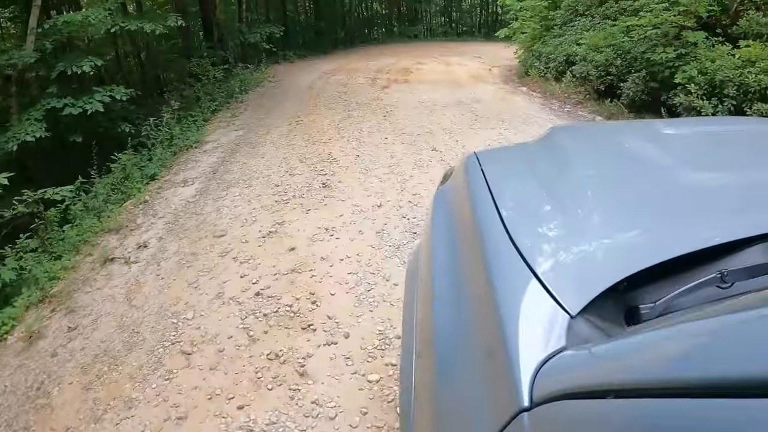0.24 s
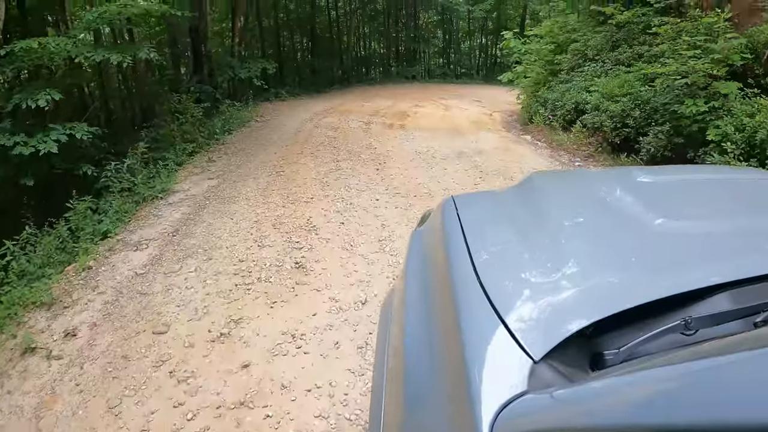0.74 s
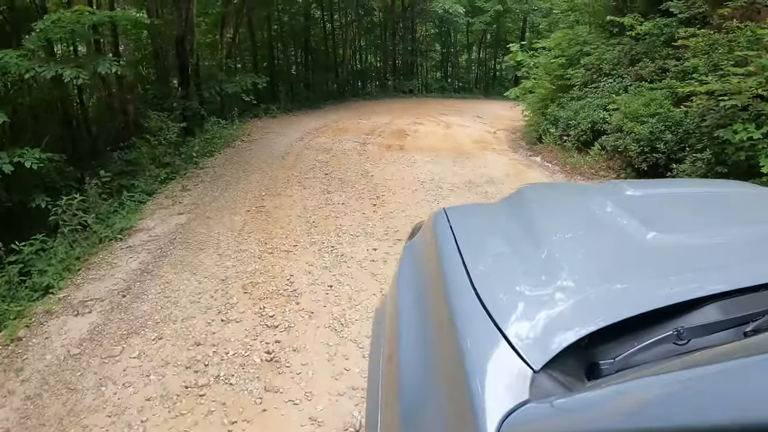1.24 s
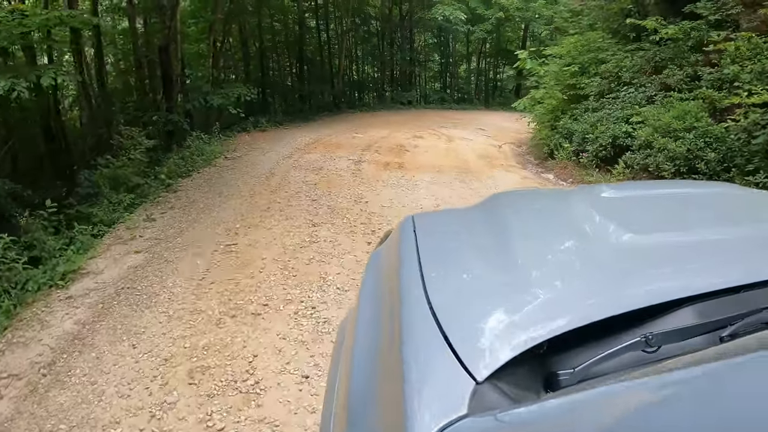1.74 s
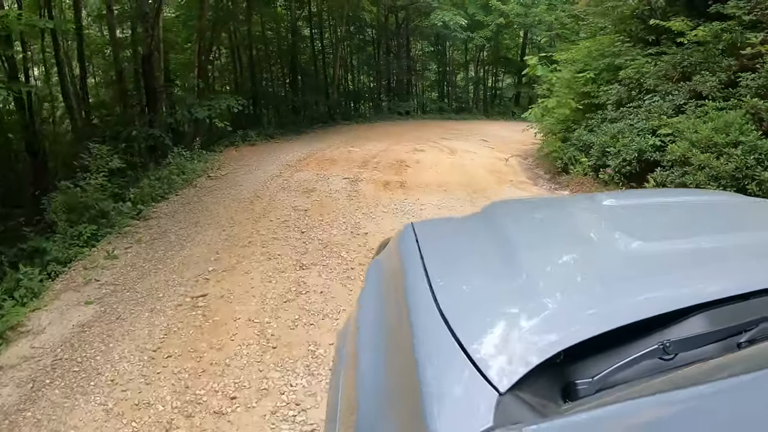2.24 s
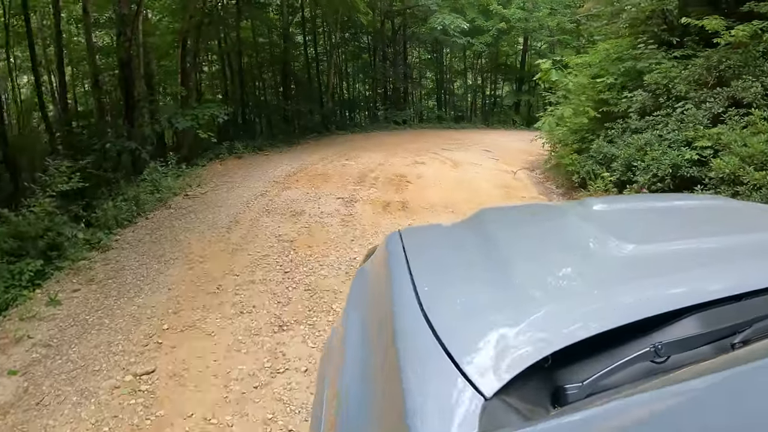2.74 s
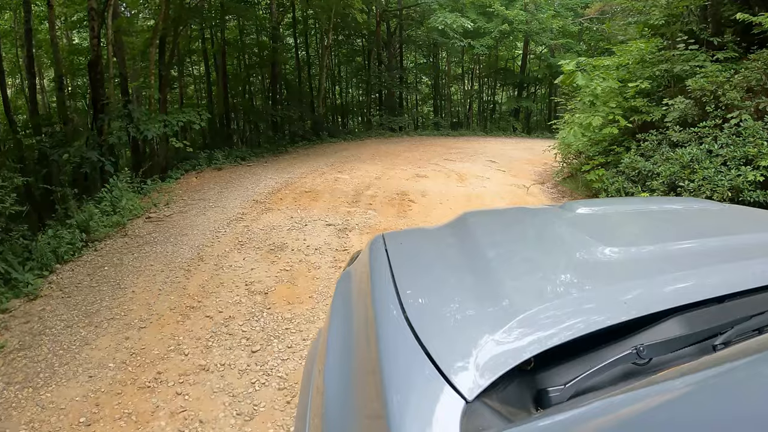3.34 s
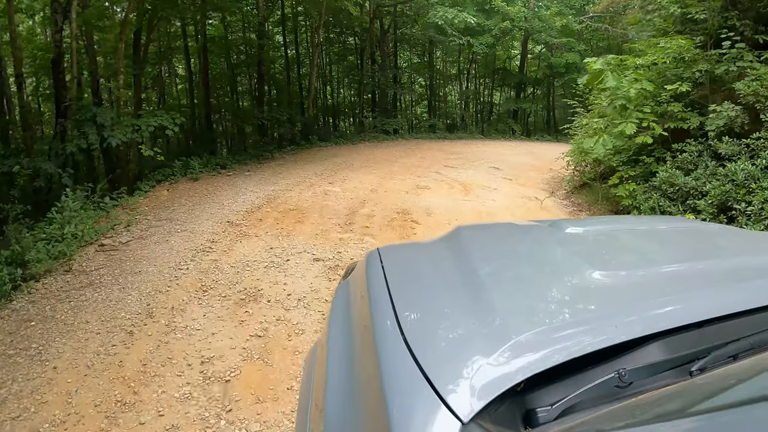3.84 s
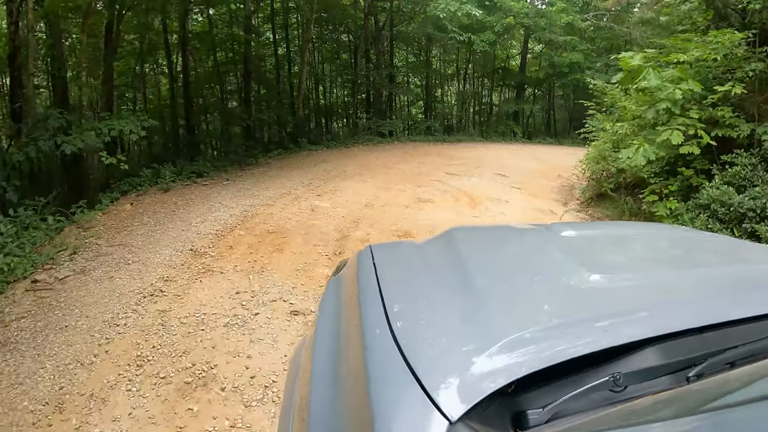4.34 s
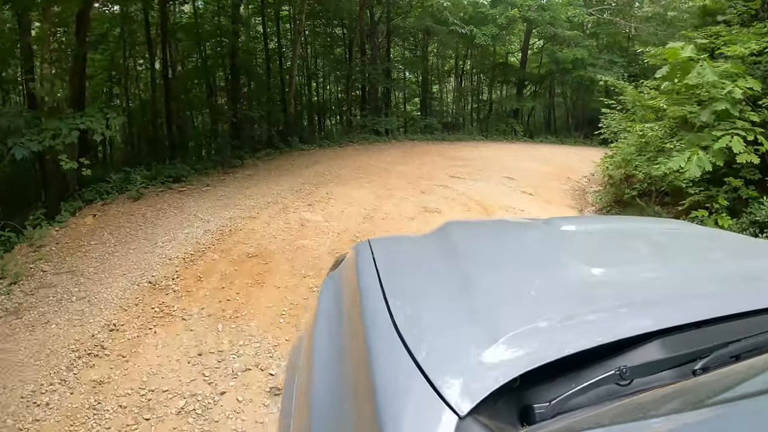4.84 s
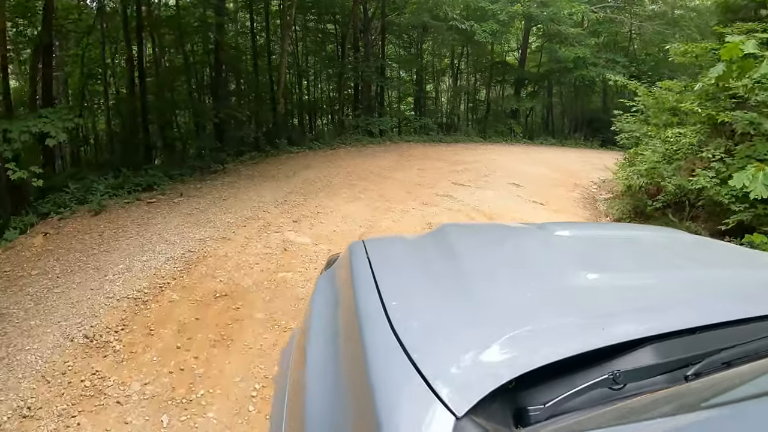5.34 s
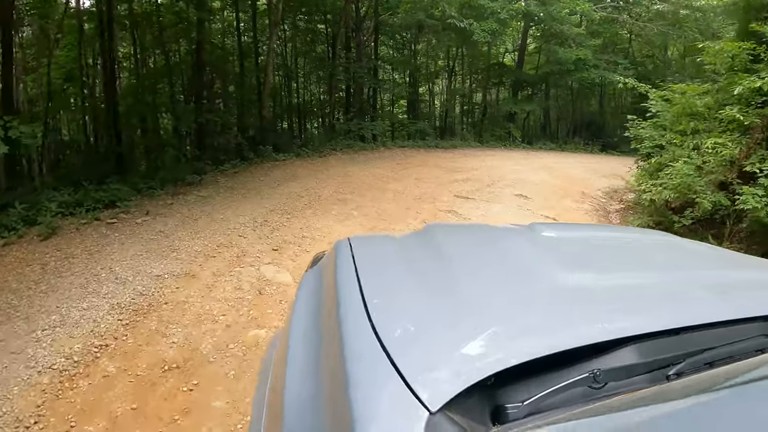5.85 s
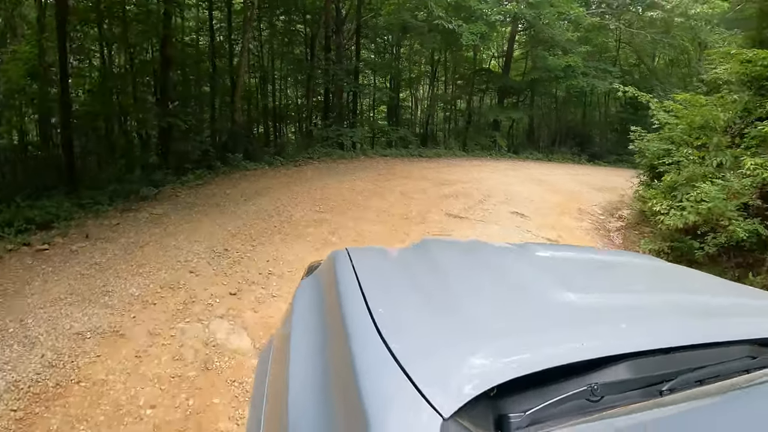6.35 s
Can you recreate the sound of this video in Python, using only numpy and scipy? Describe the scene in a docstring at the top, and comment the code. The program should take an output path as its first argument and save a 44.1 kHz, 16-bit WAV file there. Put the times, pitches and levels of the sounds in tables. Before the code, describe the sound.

Tyres crunch slowly along a gravel road with irregular dull stone pops, while the truck's body rumbles and its engine hums near idle.

```python
"""Stones pop and crack under the tyres of a pickup rolling slowly down a gravel road.
The tread snaps back as each stone slips out and rings the tyre; other stones split with a bright crack.
Small stones crunch and grit hisses throughout; the engine hums near idle, body and air rumble below.
Heard from the side window. The stereo image closes to mono at once and opens again after 2 s."""
import sys
import numpy as np
from scipy import signal
from scipy.fft import rfft, irfft, next_fast_len
from scipy.io import wavfile

SR = 44100
rng = np.random.default_rng(int(sys.argv[2]) if len(sys.argv) > 2 else 0)


def unload_wav(signal):
    """Save mono or channel-first audio to the path in sys.argv[1] as 16-bit WAV at rate SR, clipped to [-1, 1]."""
    wavfile.write(
        sys.argv[1],
        SR,
        np.round(np.clip(np.atleast_2d(signal).T, -1, 1) * 32767).astype(np.int16),
    )


N = 291501


def stone_pops():
    """The tread snaps back as a stone slips out: one or two swings of rubber, quick rise, slower fall."""
    # Each row: time in seconds, level in dB, pitch in Hz, thud re pop in dB, left-right in dB.
    stones = [(0.0751, -24.5, 660, -30, 4), (0.085, -28, 890, -23, 0), (0.1151, -26, 840, -9, 6),
              (0.15, -31, 750, -23, -1), (0.2551, -12.5, 560, -31, 3.5), (0.316, -28, 480, -24, 0),
              (0.403, -19, 393, -32, .6), (0.4451, -29, 950, -25, -2), (0.8543, -22, 616, -24, .6),
              (0.8703, -13.5, 350, -1.5, -1), (1.3234, -21, 610, -15, .6), (1.474, -27, 465, -27, .6),
              (1.5727, -11.5, 665, -40, 7), (1.9679, -21.5, 600, -11, .6), (2.302, -21.5, 390, -34, 3),
              (2.3325, -20, 610, -17, -1.5), (2.4137, -25, 470, -11, 7), (2.5803, -25.5, 524, -21, 20),
              (2.6475, -26.5, 280, -12, 17.5), (2.746, -18.5, 446, -12, 2), (3.162, -26, 466, -9, -1),
              (3.1836, -25.5, 770, -27, 3), (3.1935, -27, 830, -24, 4), (3.388, -26, 300, -5, 1),
              (3.471, -28.5, 328, -21, -1), (3.4941, -17.5, 344, -3, .4), (3.5192, -9, 450, -11.5, 0.8),
              (3.525, -20.5, 605, -24, 9), (3.533, -19, 477, -27, -1), (3.548, -32, 1150, -25, 2),
              (3.558, -21, 420, -20, 2), (3.7752, -20.5, 495, 5.5, 1), (3.789, -19.5, 740, -20, 3),
              (3.8166, -7.5, 445, -6.5, 1.5), (3.8222, -18, 980, -22, 6), (3.8386, -23, 386, -24, -3),
              (3.863, -21.5, 516, -13, 4.5), (3.992, -25.5, 513, -28, 1), (4.0589, -25, 696, -28, .6),
              (4.072, -20.5, 463, -26, 0.5), (4.102, -26, 420, -19, 2), (4.122, -26, 560, -18, 1),
              (4.1376, -20, 420, -9, -1), (4.1484, -21.5, 900, -28, 3.5), (4.159, -19.5, 600, -18, -1),
              (4.166, -19.5, 497, -21, 2), (4.1779, -20, 860, -3, 3), (4.192, -16.5, 810, -32, 2),
              (4.1957, -9, 380, -2, -0.5), (4.2005, -13.5, 960, -22, 3), (4.2064, -8.5, 600, -10.5, 2.5),
              (4.2105, -21.5, 376, -24, -2), (4.2449, -19, 724, -35, 3), (4.315, -27, 363, -20, 0),
              (4.8906, -22, 790, -27, 7.5), (4.931, -15.5, 510, -33, 6), (5.1613, -23, 486, -13, 1),
              (5.174, -26, 402, -11, 0), (5.2057, -21.5, 990, -22, 4), (5.2586, -13, 660, -5.5, 10.5),
              (5.3468, -27.5, 900, -25, 2), (5.35, -18, 442, -21, 1), (5.3632, -24.5, 780, -24, 2),
              (5.3861, -16.5, 463, -19, 1), (5.4014, -16, 1020, -34, 2.5), (5.4106, -17.5, 726, -1.5, 2.5),
              (5.434, -28, 800, -22, 3), (5.4491, -19, 600, -22, 1), (5.5519, -7.5, 600, -10, 1),
              (5.586, -25, 500, -22, 0), (5.5949, -19, 440, -21, 1.5), (5.62, -18.5, 422, -28, 0.5),
              (5.645, -26.5, 600, -25, 5), (5.6959, -17.5, 544, -17, 6), (5.719, -25, 523, -20, 2),
              (5.74, -21.5, 330, -22, 3), (5.783, -26, 330, -20, 1), (5.849, -33, 800, -20, 2),
              (5.921, -25, 445, -23, 2), (5.9335, -20, 1050, -25, 5), (5.9364, -15.5, 350, -23, 1),
              (5.9426, -16, 415, -17, 0.5), (5.9571, -29.5, 700, -27, 11), (5.995, -33, 1150, -25, 3),
              (6.1443, -22, 390, -31, 2), (6.1948, -20, 570, -22, 3), (6.2865, -20.5, 298, -6, .6),
              (6.2929, -23.5, 374, 0, 1.5), (6.4293, -23.5, 890, -29, 4), (6.5768, -26, 775, -12, 5)]
    # Low-pass that keeps the pops dull, falling steeply above about 1.2 kHz.
    # Each row: frequency in Hz, gain in dB.
    pop_lowpass = [(100, 0), (1150, 0), (1400, -12), (2200, -22), (4000, -40)]
    snap_hz, snap_db, snap_ms = 1090, -12, 0.79  # a tread block flicks back at its own pitch
    out, t = np.zeros((2, N)), np.arange(-300, 700) / SR
    phases, scatter = rng.uniform(-1.33, 1, (len(stones), 2)), reflections(len(stones))
    for (s, db, hz, thud_db, pan_db), (swing_phase, thud_phase), taps in zip(stones, phases, scatter):
        cycles = max(1.45 + 0.15 * np.log2(hz / 500), .5)
        age = t * hz / cycles
        envelope = np.exp(-np.where(age < 0, 8, 4) * age ** 2)
        sag = 1 - 40 * t  # pitch drops as the rubber settles
        swing = envelope * np.cos(2 * np.pi * hz * t * sag + np.pi / 2 + 0.5 * swing_phase)
        snap = -gain_of(snap_db) * np.exp(-(t * 1000 / snap_ms) ** 2) * np.sin(2 * np.pi * snap_hz * t)
        wheel_drop = envelope ** 0.4 * np.cos(2 * np.pi * 0.45 * hz * t + np.pi * thud_phase)
        pop = scattered(swing, taps, tail_db=-10, t60_s=0.07) + tyre_ring(swing)
        pop += scattered(snap, taps, tail_db=-4, t60_s=0.09)
        thud = gain_of(thud_db) * scattered(wheel_drop, taps, tail_db=-4.5, t60_s=0.12)
        add(out, s + t[0], gain_of(db) * (panned(pop, pan_db) + thud))
    return colour(out, pop_lowpass)


def tyre_ring(swing):
    """The tread's swing rings the tyre's air and carcass, differently for each stone."""
    # Each row: mode frequency in Hz, relative level in dB, t60 in seconds.
    modes = [(316, 6, 0.076), (408, -0.5, 0.21), (600, 1.5, 0.062), (974, -15.5, 0.042),
             (1040, -5.5, 0.099)]
    peak_db, spread_db, detune = -12.5, 5.5, 0.11
    t = np.arange(3000) / SR
    response = np.zeros_like(t)
    for hz, db, t60_s in modes:
        level_draw, pitch_draw = rng.uniform(-1, 1, 2)
        envelope = gain_of(db + spread_db * level_draw - 60 * t / t60_s)
        response += envelope * np.sin(2 * np.pi * hz * (1 + detune * pitch_draw) * t)
    ring = signal.fftconvolve(swing, response)
    return gain_of(peak_db) * ring / abs(ring).max()


def stone_cracks():
    """Stones split or strike: a burst of splinters, gone in a few ms. Hard stones keep more treble."""
    # Each row: start in seconds, level in dB, pitch in Hz, treble tilt (lower is duller).
    stones = [(0.0747, -37, 1800, -27), (0.11, -32.5, 1790, -36), (0.253, -30, 1590, -17.5),
              (0.785, -42, 3930, -12.5), (0.794, -54, 2500, -2), (0.818, -52, 3000, -12),
              (0.827, -36, 2000, -22), (0.8683, -39.5, 2490, -18), (1.646, -42, 2040, -16),
              (2.2, -43, 2100, -11), (2.86, -59, 2060, -5), (3.195, -34.5, 1900, -29),
              (3.548, -35, 1700, -16), (3.5814, -49, 2530, -6), (3.7723, -39, 2290, -10),
              (3.862, -54, 2500, -7), (4.059, -45, 2150, -11), (4.147, -33.5, 2040, -25),
              (4.158, -32, 2060, -19), (4.195, -29, 1600, -16), (4.26, -51, 2170, -11),
              (4.8866, -43, 2260, -13), (5.256, -36, 3450, -26), (5.3454, -40, 2230, -20),
              (5.363, -50, 2260, -11), (5.3836, -35, 2170, -17), (5.3994, -25.5, 1710, -18),
              (5.552, -24, 1620, -24), (5.641, -44, 2500, -10), (6.4278, -41, 2320, -10),
              (6.49, -38, 2320, -16)]
    # Treble loss on the way round the wing. Each row: frequency in Hz, gain in dB.
    wing_shadow = [(7000, 0), (14000, -9)]
    out, age = np.zeros((2, N)), np.arange(900) / SR / 0.00144
    envelope = age * np.exp(1 - age) ** 1.05
    noises, scatter = rng.standard_normal((len(stones), len(age))), reflections(len(stones))
    for (s, db, hz, tilt), noise, taps in zip(stones, noises, scatter):
        spectrum = [(hz / 4, -7), (hz, 0), (hz * 8, 2.6 * tilt)]
        burst = colour(noise, spectrum) * envelope
        burst = colour(burst, [(f, d / 3) for f, d in spectrum])
        burst *= np.linalg.norm(envelope) / np.linalg.norm(burst) / 2
        crack = gain_of(db) * scattered(burst, taps, tail_db=-11, t60_s=.03)
        add(out, s, panned(crack, pan_db=8.5))
    return colour(out, wing_shadow)


def gravel():
    """Small stones shift and scrape, grit and fine spray hiss, and loose ground flings up more grit."""
    # Each row: time in seconds, then crunch, scrape and grit levels in dB.
    road_levels = [(0.0, -36, -44.5, -54.5), (0.18, -36, -48.5, -55.5), (0.55, -39.5, -52, -56),
                   (0.92, -38.5, -51, -56), (1.5, -36, -50.5, -55.5), (2.04, -37.5, -52, -56),
                   (2.6, -38.5, -49.5, -57.5), (3.2, -36, -50, -55.5), (3.7, -35, -50, -55),
                   (4.15, -37, -45.5, -53.5), (4.35, -36, -49, -54), (4.55, -37, -49.5, -54),
                   (4.9, -39.5, -46, -53), (5.15, -36, -46, -52), (5.5, -35.5, -43.5, -51.5),
                   (5.83, -37.5, -47, -52), (5.98, -33.5, -44, -51), (6.04, -34.5, -46, -51.5),
                   (6.3, -38.5, -45.5, -52), (6.6, -38.5, -44.5, -51)]
    # Bursts of flung grit. Each row: centre in seconds, half length in seconds, level in dB.
    flings = [(2.885, 0.056, -75), (3.507, .04, -70), (3.785, .03, -66), (4.163, .04, -67),
              (4.278, .03, -69), (5.4, 0.036, -68)]
    # Five spectra. Each row: frequency in Hz, relative density in dB.
    crunch_spectrum = [(70, -20), (125, 0.5), (170, -3.5), (260, -8), (400, -10.5), (590, -12.5),
                       (950, -18.5), (1200, -29.5), (1700, -34), (3000, -51), (6000, -120)]
    scrape_spectrum = [(500, -48), (900, 3), (1300, 2.5), (1700, -5), (2300, -20.5), (3500, -28.5),
                       (7000, -65)]
    grit_spectrum = [(700, -14), (1500, 0.5), (2200, -0.5), (3200, -6.5), (4000, -9), (5000, -14.5),
                     (6300, -25), (8000, -27.5), (10000, -30.5), (12000, -60), (14000, -50.5)]
    spray_spectrum = [(3500, -10), (5500, 3), (7500, -3.5), (9000, -12.5), (10500, -14), (12500, -17.5),
                      (14000, -35)]
    flung_spectrum = [(2500, -15), (5000, -1), (8000, -6), (12000, -16.5), (14000, -25)]
    crunch_db, scrape_db, grit_db = columns(road_levels)
    spray_db = -75.5 + 2.6 * (grit_db + 55.5)  # spray grows faster than grit
    shared_clump = drift(rate_hz=13.2)
    crunch = grains(crunch_spectrum, per_s=1500, spread_db=0.5, clump_db=0.64, clump_hz=43)
    scrape = grains(scrape_spectrum, per_s=3000, spread_db=2.43, clump_db=2.7, clump_hz=27)
    grit = grains(grit_spectrum, per_s=6000, spread_db=1.2, clump_db=0.31, clump_hz=30)
    spray = grains(spray_spectrum, per_s=3000, spread_db=1.1, clump_db=0.9, clump_hz=40)
    flung = grains(flung_spectrum, per_s=2500, spread_db=2.2, clump_db=1.5, clump_hz=60)
    t = np.arange(N) / SR
    bursts = sum(gain_of(db) * np.exp(-((t - s) / half_s) ** 2) for s, half_s, db in flings)
    return (crunch * gain_of(crunch_db + shared_clump)
            + scrape * gain_of(scrape_db + 1.27 * shared_clump)
            + grit * gain_of(grit_db + 0.8 * shared_clump)
            + spray * gain_of(spray_db + 0.66 * shared_clump)
            + flung * bursts)


def grains(spectrum, per_s, spread_db, clump_db, clump_hz):
    """Stone contacts in stereo: random clicks, mostly small, that come in clumps."""
    def clicks():
        size = gain_of(spread_db * np.minimum(rng.exponential(1, N), 4)) * rng.choice([-1., 1.], N)
        hits = rng.random(N) < per_s / SR
        return unit_rms(colour(size * hits * gain_of(clump_db * drift(clump_hz)), spectrum))
    return stereo(clicks(), clicks())


def body_rumble():
    """Body and air shake: low noise in random lumps."""
    # Each row: time in seconds, level in dB.
    shake_levels = [(0.0, -34.5), (1.17, -29.5), (1.21, -23.5), (1.23, -42), (1.45, -22.5), (1.47, -31),
                    (3.56, -27), (3.67, -40), (3.73, -18), (3.79, -32), (3.92, -27), (4.43, -27),
                    (4.47, -22), (4.7, -34), (4.76, -19.5), (4.82, -36), (4.89, -25.5), (5.46, -32.5),
                    (5.86, -26), (5.92, -31.5), (5.97, -25), (6.34, -28), (6.51, -25.5), (6.6, -32)]
    # Each row: frequency in Hz, relative density in dB.
    spectrum = [(8, -23), (14, 0.5), (30, 5.5), (50, 1.5), (58, -10.5), (72, -0.5), (95, -12.5),
                (150, -23.5), (260, -51), (600, -64), (1500, -150)]
    common, unrelated = (unit_rms(colour(rng.standard_normal(N), spectrum)) for _ in range(2))
    lumps_db = drift(rate_hz=8)
    return stereo(common, unrelated) * gain_of(columns(shake_levels)[0] + lumps_db)


def engine():
    """Low orders of the firing cycle near idle, unsteady in pitch and level."""
    # Each row: time in seconds, lowest order in Hz, level in dB.
    running = [(0, 17.6, -38.5), (.6, 17.7, -37.5), (1.1, 18.05, -35), (1.6, 17.95, -36),
               (2.2, 17.62, -32.5), (3.5, 17.6, -32.5), (5, 17.61, -32.5), (5.7, 17.75, -38),
               (6.6, 17.6, -29.5)]
    # Each row: multiple of the lowest order, relative level in dB.
    orders = [(1, -4.5), (2, -7), (4, -11.5), (6, -1.5), (8, -14)]
    waver_db, channel_phase_rad = 2.6, np.array([[0.075], [-0.075]])
    hz, db = columns(running)
    turns = np.cumsum(hz * (1 + 0.0068 * drift(rate_hz=2.2))) / SR
    hum = np.zeros((2, N))
    for order, order_db in orders:
        gain = gain_of(db + order_db + waver_db * drift(rate_hz=5.6))
        hum += gain * np.sin(2 * np.pi * (order * turns + rng.random()) + channel_phase_rad)
    return hum


def reflections(count):
    """One row of sparse random taps per stone."""
    return rng.standard_normal((count, 3000)) * (rng.random((count, 3000)) < .1)


def scattered(sound, taps, tail_db, t60_s):
    """The sound plus its decaying reflections in tyre and wheel arch."""
    t = np.arange(len(taps)) / SR
    tail = taps * gain_of(-60 * t / t60_s) * (t > .002)
    return signal.fftconvolve(sound, (t == 0) + gain_of(tail_db) * tail / np.linalg.norm(tail))


def stereo(mid, unrelated):
    """A common sound leaning left, widened by a weaker unrelated one."""
    # Each row: frequency in Hz, side re mid in dB.
    width = [(40, -26.5), (120, -25), (250, -26.5), (700, -12), (1500, -7.5), (3500, -4), (9000, -3),
             (14000, -8)]
    # Each row: frequency in Hz, left-right in dB.
    lean = [(60, 0), (250, .4), (700, 2), (1500, 2), (4000, 1.2), (12000, .5)]
    mid_to_side = [(hz, 20 * np.log10(np.tanh(abs(db) * np.log(10) / 40) + 1e-4)) for hz, db in lean]
    side = colour(unrelated, width) + colour(mid, mid_to_side)
    return np.array([mid + side, mid - side])


def panned(sound, pan_db):
    return sound * gain_of([[pan_db / 2], [-pan_db / 2]])


def gain_of(db):
    return 10 ** (np.asarray(db) / 20)


def unit_rms(x):
    return x / np.sqrt(np.mean(x ** 2) + 1e-20)


def drift(rate_hz):
    """Low-passed noise of rms 1."""
    return unit_rms(signal.sosfilt(signal.butter(2, rate_hz, fs=SR, output="sos"), rng.standard_normal(N)))


def columns(rows):
    """Timed rows as one per-sample curve per column."""
    s, *values = np.transpose(rows)
    return [np.interp(np.arange(N) / SR, s, v) for v in values]


def colour(x, spectrum):
    """Filter by (Hz, dB) points joined over log frequency."""
    size = next_fast_len(x.shape[-1])
    hz, db = np.transpose(spectrum)
    bin_db = np.interp(np.log(np.fft.rfftfreq(size, 1 / SR) + 1), np.log(hz + 1), db)
    return irfft(rfft(x, size) * gain_of(bin_db), size)[..., :x.shape[-1]]


def add(mix, start_s, sound):
    part = mix[:, max(round(start_s * SR), 0):][:, :sound.shape[1]]
    part += sound[:, :part.shape[1]]


def scene():
    return stone_pops() + stone_cracks() + gravel() + body_rumble() + engine()


def record(dry):
    """Varying stereo width, faint microphone hiss and a band limit."""
    # Each row: time in seconds, side gain in dB.
    width = [(0, -3), (.26, -17), (.33, -28), (.6, -70), (2.0, -76), (2.25, -21), (2.65, -12.5), (3.0, -7),
             (6.6, -3)]
    # Each row: frequency in Hz, relative density in dB.
    hiss_spectrum = [(3000, -24), (7000, -2.5), (11000, -12.5), (13000, -4), (14500, -11.5)]
    hiss_db, cutoff_hz = -86, 14250
    mid = (dry[0] + dry[1]) / 2
    side = (dry[0] - dry[1]) / 2 * gain_of(columns(width)[0])
    hiss = gain_of(hiss_db) * unit_rms(colour(rng.standard_normal((2, N)), hiss_spectrum))
    mix = np.array([mid + side, mid - side]) + hiss
    lowpass = signal.firwin(511, cutoff_hz, window=("kaiser", 9), fs=SR)
    return signal.oaconvolve(np.pad(mix, ((0, 0), (255, 255)), "reflect"), lowpass[None], "valid", axes=1)


dry = scene()
out = record(dry)
unload_wav(out)
```